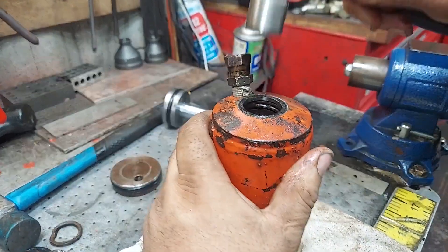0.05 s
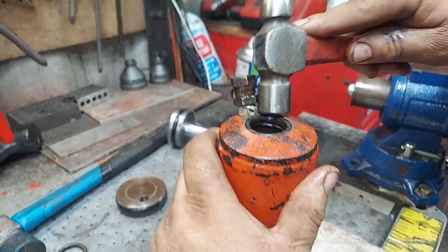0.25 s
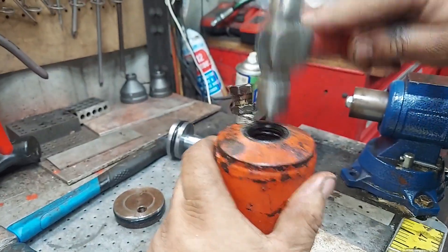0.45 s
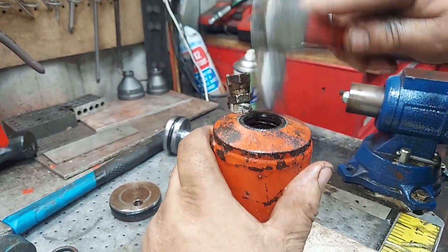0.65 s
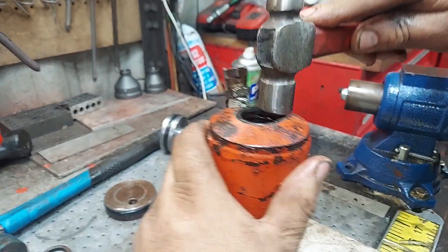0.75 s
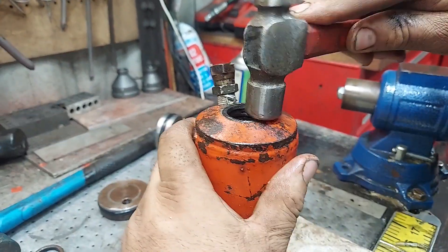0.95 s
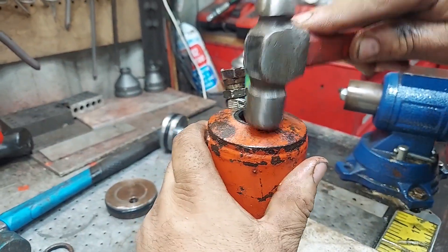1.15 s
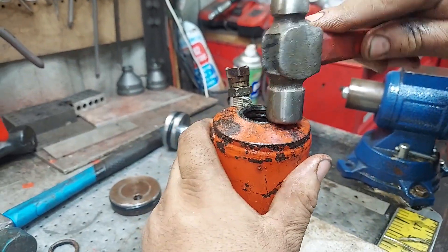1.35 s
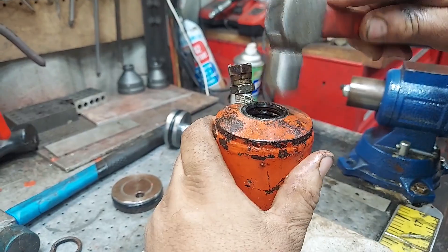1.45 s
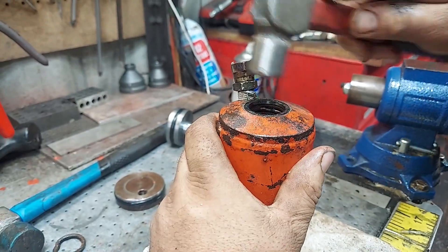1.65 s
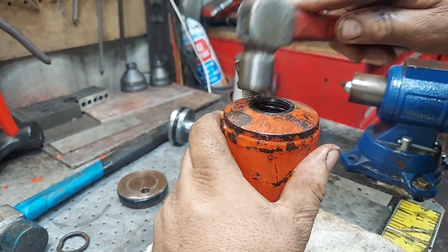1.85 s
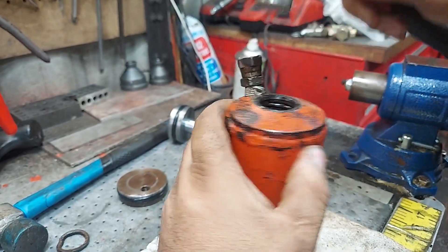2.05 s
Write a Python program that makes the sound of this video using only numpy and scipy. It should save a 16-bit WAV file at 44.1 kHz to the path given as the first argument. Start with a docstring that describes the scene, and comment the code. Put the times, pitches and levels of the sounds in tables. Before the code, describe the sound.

Close stereo phone pickup of hard steel hammer taps, each a sharp crack with short ring, grainy rattle and bench thump, first bouncing irregularly, then evenly paced, finally a quiet juddering turn of the cylinder in a small damped room.

```python
"""A ringing blow is dying away, then a small hammer taps a steel seal into a hand-held cylinder on a workbench.
Blows and bounces ring head, tube and seal as decaying modes; noise makes the crack and its rattle,
and the bench thuds as it is pushed and then chattered on. At the end the cylinder is turned: stick-slip
pulses judder and resonant noise scrapes. A phone records it close by, its two ports picking up
a small damped workshop of decaying noise and a faint hum of coloured noise."""
import sys
import numpy as np
from scipy import signal
from scipy.fft import rfft, irfft
from scipy.io import wavfile
from scipy.ndimage import uniform_filter1d

SR = 44100
rng = np.random.default_rng(int(sys.argv[2]) if len(sys.argv) > 2 else 0)


def how_loud(loudness_db):
    """Turn decibels into a plain amplitude multiplier (0 dB gives 1, 20 dB gives 10)."""
    steps = np.asarray(loudness_db, float) / 20
    return 10 ** steps


def transcribe(signal):
    """Save signal, clipped to [-1, 1], as a 16-bit WAV file at the path in sys.argv[1]."""
    frames = np.atleast_2d(signal).T
    limited = np.clip(frames, -1, 1)
    pcm = np.round(limited * 32767).astype(np.int16)
    wavfile.write(sys.argv[1], SR, pcm)


N = 92610  # samples


def curve(table, hz):
    """Second column of a table at hz, straight on a log frequency axis."""
    points = np.array(table, float)
    return np.interp(np.log(np.maximum(hz, 1)), np.log(points[:, 0]), points[:, 1])


def unit(x):
    """Scale to rms 1."""
    return x / np.sqrt(np.mean(x ** 2))


def colour(x, table):
    """Give a white noise the spectrum of a table."""
    hz = np.fft.rfftfreq(x.shape[-1], 1 / SR)
    return irfft(rfft(x) * how_loud(curve(table, hz)), x.shape[-1])


def band(x, hz, width):
    """Two-pole resonance, gain 1 at the centre."""
    return signal.lfilter(*signal.iirpeak(hz, max(hz / width, 0.3), fs=SR), x)


def high_pass(x, hz, order=2):
    """Butterworth low cut."""
    return signal.sosfilt(signal.butter(order, hz, "high", fs=SR, output="sos"), x)


def fade(length, t60):
    """Exponential decay by 60 dB in t60 seconds."""
    return np.exp(-np.log(1000) * np.arange(length) / SR / t60)


def pair(noise):
    """Two channels from two noises: alike in the bass, unrelated above, as at two spaced ports."""
    alike_below_hz = 395
    low_pass = signal.butter(2, alike_below_hz, "low", fs=SR, output="sos")
    low = signal.sosfilt(low_pass, noise[0])
    return np.array([noise[0], low + high_pass(noise[1], alike_below_hz)])


def ring(freqs, modes, force):
    """All modes of one body answer a force as decaying sines, with a level and phase for each port."""
    spot_scatter_db = -0.88  # each blow lands elsewhere and favours other modes
    side = np.array([[0.5], [-0.5]])  # left, right
    out = 0
    for hz, (db, t60, pan_db, lead) in zip(freqs, modes):
        decay = np.log(1000) / (max(t60, 0.01) * SR)
        pole = np.exp(2j * np.pi * hz / SR - decay)
        swing = signal.lfilter([1], [1, -pole], force) * np.exp(1j * lead * side)
        scatter_db = spot_scatter_db * rng.standard_normal()
        out = out + swing.imag * how_loud(db + scatter_db + pan_db * side)
    return out


def hammer():
    """All blows and bounces laid down at their times, after a quarter second of run-in."""
    # Each row: start in seconds, then levels in dB of head ring, tube ring, seal knock, crack, bench thud.
    blows = [(0.2373, -19.5, -30, -15.5, -18, -19.5), (0.399, -59, -47, -62, -55, -53.5),
             (0.4836, -29.5, -33, -34, -31.5, -46), (0.4949, -52, -18.5, -18, -24, -19),
             (0.5133, -24.5, -36, -29, -23, -28.5), (0.61, -54, -41, -62, -44.5, -55),
             (0.7141, -19, -56, -23, -15.5, -19.5), (0.912, -24.5, -43, -20, -20.5, -21),
             (1.116, -23.5, -27.5, -14.5, -20, -23), (1.329, -21, -29, -20, -19, -22.5),
             (1.5207, -21.5, -27.5, -24, -20.5, -22.5), (1.757, -38, -35.5, -34, -22.5, -18),
             (1.8208, -40, -31.5, -34, -36.5, -50), (1.921, -71, -81, -62, -59.5, -52),
             (1.937, -74, -76.5, -67, -67, -60)]
    # The blow just before the start, still dying away: seconds before it, then the same five levels in dB.
    earlier = (.075, -32, -33, -28, -24, -23)
    out = np.zeros((2, N + SR))
    run_in = SR // 4
    for start_s, *levels_db in [(-earlier[0], *earlier[1:])] + blows:
        sound = blow(*levels_db)
        i = run_in + int(round(start_s * SR))
        out[:, i:i + sound.shape[1]] += sound
    return out[:, :N + run_in]


def blow(head_db, tube_db, seal_db, crack_db, thud_db, length=22050):
    """One blow: an instant tick rings the steel, cracks, and pushes the bench."""
    tick = (np.arange(length) == 0) * 1.0
    hops = chatter(length)
    return (how_loud(head_db) * head_ring(tick) + how_loud(tube_db) * tube_ring(tick)
            + how_loud(seal_db) * seal_knock(tick) + how_loud(crack_db) * crack(hops)
            + how_loud(thud_db) * bench_thud(tick, hops))


def chatter(length):
    """The cylinder chatters on the bench: sparse random impacts that die out after the blow."""
    per_s, spread_s = 320, 0.032
    t = np.arange(length) / SR
    hits = rng.random(length) < per_s / SR
    return hits * rng.standard_normal(length) * np.exp(-(t / spread_s) ** 2)


def head_ring(tick):
    """The hammer head rings as short modes, roughened by a decaying noise force."""
    # Mode frequencies in Hz.
    head_hz = [4311, 7096, 7190, 7310, 8085, 8790, 9550, 10790, 12370, 12560, 14900]
    # Modes of the head. Each row: relative level in dB, t60 in seconds, left minus right in dB,
    # phase by which left leads in radians.
    head = [(-6.5, 0.18, -2.5, 1.34), (-5, 0.093, 3.5, 1.9), (2.5, .05, -14, 1.4), (-3.5, 0.033, 0.5, 1.9),
            (-9, 0.073, 2, 1.9), (-0.5, 0.048, 7, 1.2), (-36, 0.017, -8, 1.2), (1.5, 0.037, 3, 0.47),
            (1, .05, -6, 3.3), (-23.5, 0.051, 8.5, 1.6), (-2.5, 0.049, -5, 1.4)]
    rough_db, rough_t60_s = -24, 0.091
    rough = rng.standard_normal(len(tick)) * fade(len(tick), rough_t60_s)
    return ring(head_hz, head, tick + how_loud(rough_db) * rough)


def tube_ring(tick):
    """The cylinder tube rings at its own modes."""
    # Mode frequencies in Hz.
    tube_hz = [2605, 4311]
    # Modes of the tube. Each row: relative level in dB, t60 in seconds, left minus right in dB,
    # phase by which left leads in radians.
    tube = [(0, 0.21, 10.5, 0.11), (-5.5, 0.093, -2, 1.6)]
    return ring(tube_hz, tube, tick)


def seal_knock(tick):
    """The steel seal knocks as a few short modes."""
    # Mode frequencies in Hz.
    seal_hz = [1255, 1500, 1900]
    # Modes of the seal. Each row: relative level in dB, t60 in seconds (10 ms at least in ring()),
    # left minus right in dB, phase by which left leads in radians.
    seal = [(-2, 0.05, -1, 0.95), (7, 0.047, -0.1, 1), (-7.5, 0.0067, 0.19, 2.4)]
    return ring(seal_hz, seal, tick)


def crack(hops):
    """Contact noise: a short crack, and with it a longer rattle made grainy by the chatter."""
    # Spectrum of the crack. Each row: frequency in Hz, relative density in dB per Hz.
    crack_spectrum = [(150, -45.5), (400, -18), (1500, 11.5), (3000, -6), (6000, -14), (10500, 11),
                      (13000, 5), (15500, -33.5), (17000, -59)]
    # Spectrum of the rattle. Each row: frequency in Hz, relative density in dB per Hz.
    rattle_spectrum = [(150, -71), (400, -3), (1500, -0.5), (3000, -6), (6000, -14), (10500, -14.5),
                       (11800, -23), (17500, -65)]
    crack_t60_s, rattle_t60_s, rattle_db = 0.01, 0.19, 0.5
    length = len(hops)
    middle, sides = rng.standard_normal((2, length))
    noise = np.array([middle + sides, middle - sides])  # equal shares: left and right are unrelated
    grains = 1 + uniform_filter1d(np.abs(hops), size=60) * 60
    snap = unit(colour(noise, crack_spectrum)) * fade(length, crack_t60_s)
    rattle = unit(colour(noise, rattle_spectrum)) * grains * fade(length, rattle_t60_s)
    return snap + how_loud(rattle_db) * rattle


def bench_thud(tick, hops):
    """Bench modes answer a soft half-sine push by the blow and by each chatter impact, cut in the bass."""
    # Mode frequencies in Hz.
    bench_hz = [68, 87, 101, 135, 170, 232, 262, 300, 360, 405, 480, 560, 620, 850, 1066]
    # Modes of the bench. Each row: relative level in dB, t60 in seconds, left minus right in dB,
    # phase by which left leads in radians.
    bench = [(-12.5, 0.46, 1.5, 0.87), (-6.5, 0.21, -3, 0.32), (3, 0.25, -0.5, 0.27), (-2, 0.11, 0, 0.4),
             (-23, 0.18, -7, 0.55), (-18.5, 0.2, -3.5, .5), (-16.5, 0.2, -2, 0.22),
             (-20.5, 0.076, -5, 0.27), (-3, 0.037, 2.5, .6), (-2, 0.082, -2.5, 0.2), (-2, 0.047, -6, 1.01),
             (-2.5, 0.055, -13.5, 0.43), (-4, 0.073, -5, 0.47), (-2.5, .06, -2.5, 0.5),
             (-38, .07, -6, 1.574)]
    push_s, chatter_db, chatter_above_hz = 0.001, 2.5, 178
    t = np.arange(len(tick)) / SR
    push = np.sin(np.pi * np.clip(t / push_s, 0, 1))
    impacts = tick + how_loud(chatter_db) * high_pass(hops, chatter_above_hz)
    force = signal.fftconvolve(impacts, push / push.sum())[:len(tick)]
    return ring(bench_hz, bench, force)


def turning():
    """The cylinder is turned: stick-slip pulses shake the bench while the rim scrapes."""
    # Course of the turn. Each row: time in seconds, judder rate in Hz, judder level in dB, scrape level in dB.
    turn = [(1.939, 99, -52, -72.5), (1.969, 112, -46, -63), (2.0, 120, -38.5, -58),
            (2.035, 107.6, -49, -56.5), (2.055, 111.2, -54, -56.5), (2.1, 100, -70, -56.5)]
    # Bench resonances, each passed twice. Each row: centre in Hz, width of one pass in Hz, relative level in dB.
    judder_bands = [(120, 140, 0), (235, 97, -9.5), (380, 55, -6), (810, 100, -21)]
    # Rim resonances, each passed twice. Each row: centre in Hz, width of one pass in Hz, relative level in dB.
    scrape_bands = [(1550, 1800, 8), (2460, 430, 9), (4230, 1200, -4.5), (11200, 2500, -2.5)]
    t = np.arange(N) / SR
    course = np.array(turn, float)
    rate_hz, judder_db, scrape_db = (np.interp(t, course[:, 0], course[:, k]) for k in (1, 2, 3))
    count = np.floor(np.cumsum(rate_hz) / SR)
    slips = np.diff(count, prepend=0) * how_loud(3.7 * rng.standard_normal(N))  # uneven by 3.7 dB
    judder, scrape = 0, 0
    for hz, width, db in judder_bands:
        judder = judder + how_loud(db) * band(band(slips, hz, width), hz, width)
    for hz, width, db in scrape_bands:
        noise = pair(rng.standard_normal((2, N)))
        scrape = scrape + how_loud(db) * band(band(noise, hz, width), hz, width)
    started = t > course[0, 0]
    return started * (unit(judder) * how_loud(judder_db) + unit(scrape) * how_loud(scrape_db))


def workshop(x):
    """Reflections: decaying noise, each half octave with its own reverberation time."""
    # Damping of the room. Each row: frequency in Hz, t60 in seconds.
    room = [(60, 0.21), (160, 0.18), (420, 0.36), (1100, 0.29), (2900, 0.27), (7700, 0.27), (16000, 0.14)]
    room_db, gap_s = -10.5, 0.0037
    length = SR // 2
    noise = pair(rng.standard_normal((2, length)))
    tail = 0
    for hz in 45 * 2 ** np.arange(0, 9, 0.5):
        t60 = curve(room, hz)
        tail = tail + band(noise, hz, hz / 1.82) * fade(length, t60) / np.sqrt(t60)
    # silent for the gap, then rising over as long again
    tail = tail * np.clip(np.arange(length) / SR / gap_s - 1, 0, 1)
    tail = tail / np.sqrt(np.mean(np.sum(tail ** 2, axis=1)))
    mono = x.mean(axis=0)[None]
    return how_loud(room_db) * signal.fftconvolve(mono, tail, axes=1)[:, :x.shape[1]]


def hum():
    """The steady background of the shop: coloured noise, strongest in the bass."""
    # Spectrum of the background. Each row: frequency in Hz, relative density in dB per Hz.
    shop = [(30, -16.5), (80, -1.5), (200, -14.5), (500, -15), (1000, -15), (1530, -14), (2300, -29.5),
            (4000, -40.5), (8000, -43.5), (16000, -50)]
    shop_db = -57  # rms at the ports
    return how_loud(shop_db) * unit(colour(pair(rng.standard_normal((2, N))), shop))


def scene():
    """Blows and turning, direct (sooner at the left port) and from the walls, over the background."""
    left_lead_s = 0.0001023
    near = hammer()
    near[:, -N:] += turning()
    n = near.shape[1]
    delay = np.exp(-2j * np.pi * np.fft.rfftfreq(n, 1 / SR) * left_lead_s)
    right = irfft(rfft(near[1]) * delay, n)
    direct = np.array([near[0], right])
    return (direct + workshop(near))[:, -N:] + hum()


def top_cut(x):
    """Nothing passes above the cut-off."""
    return signal.sosfilt(signal.butter(12, 17110, fs=SR, output="sos"), x)


def record(dry):
    """The phone cuts the lowest bass, rounds the loudest peaks and cuts the top."""
    low_cut_hz, top_hz = 63, 16800
    rounded = np.tanh(high_pass(dry, low_cut_hz, order=3))
    mix = signal.sosfilt(signal.ellip(8, 0.2, 70, top_hz, fs=SR, output="sos"), rounded)
    return top_cut(mix)


dry = scene()
out = record(dry)
transcribe(out)
```